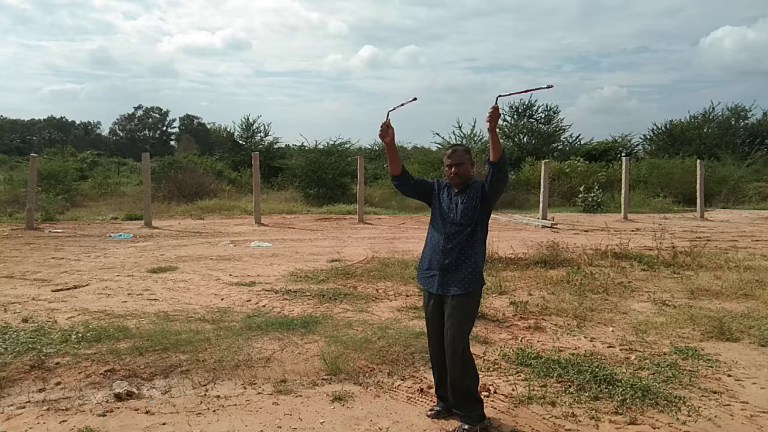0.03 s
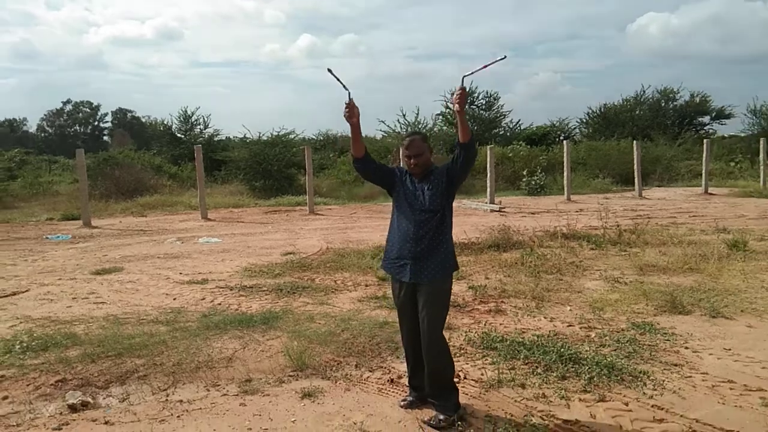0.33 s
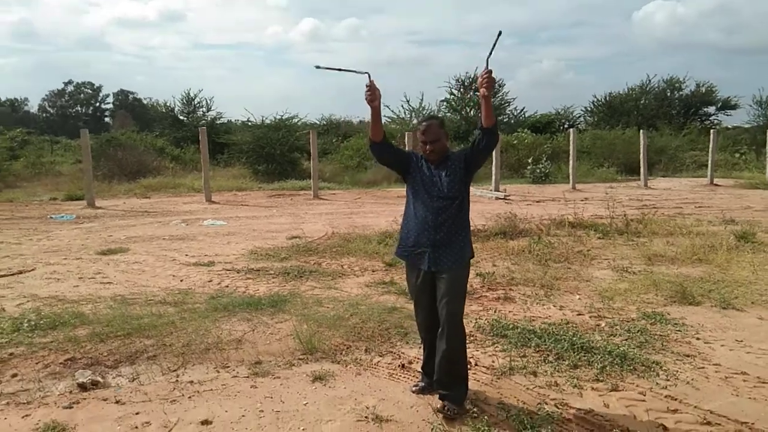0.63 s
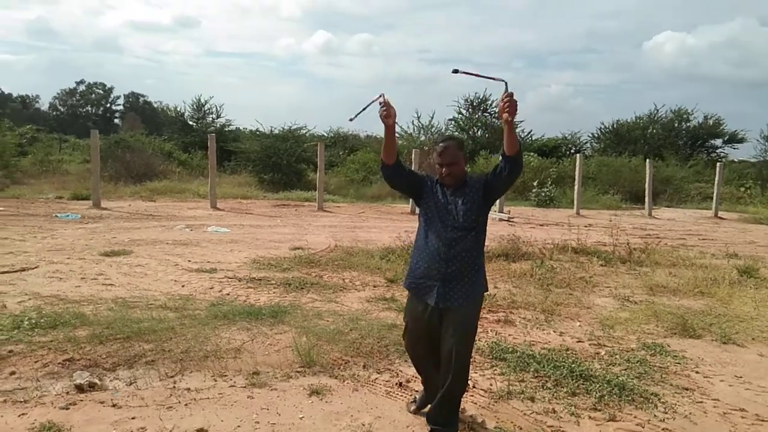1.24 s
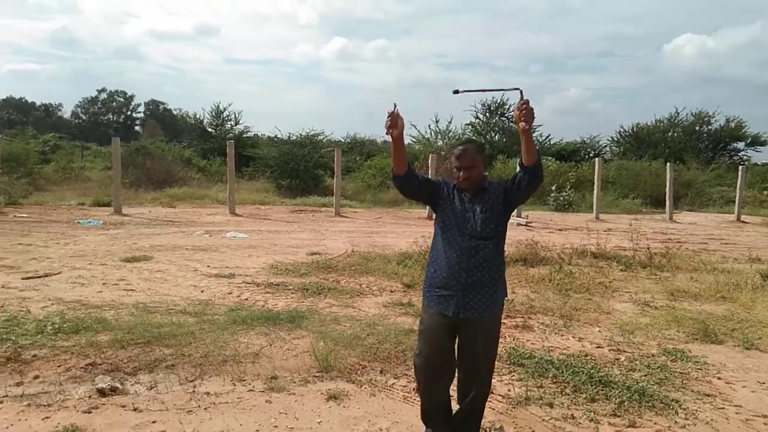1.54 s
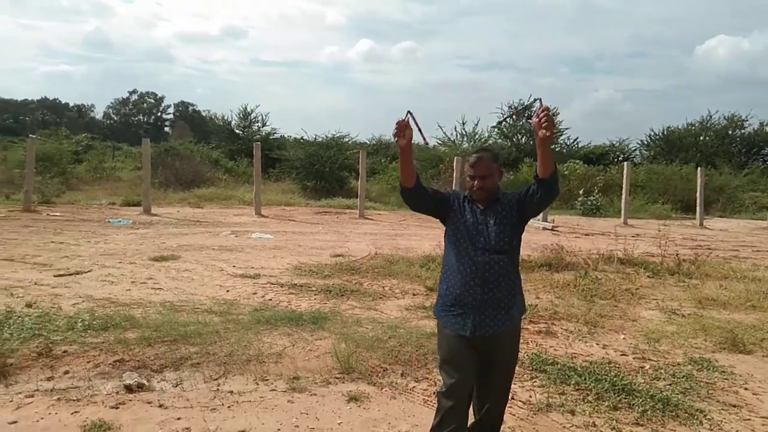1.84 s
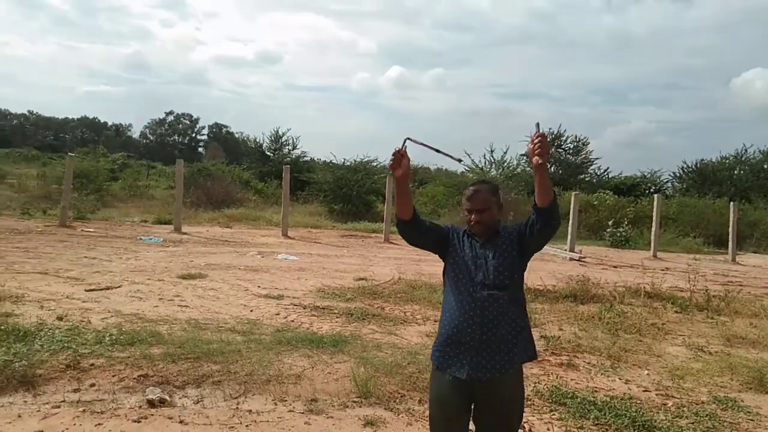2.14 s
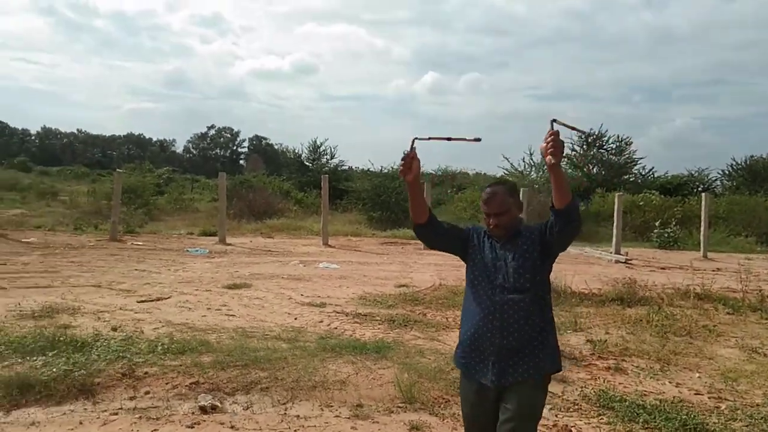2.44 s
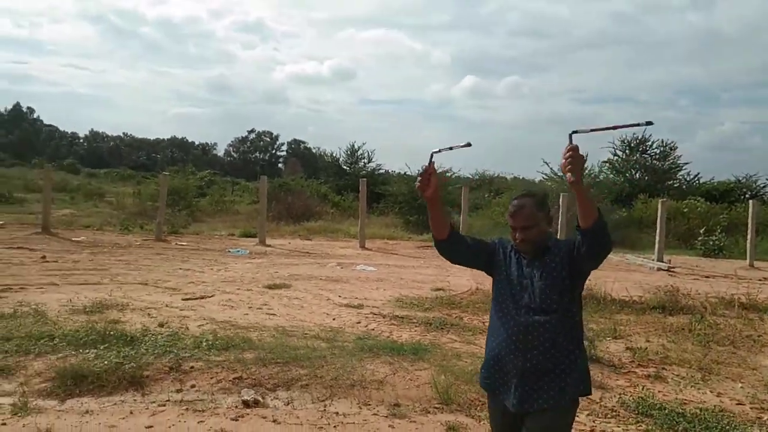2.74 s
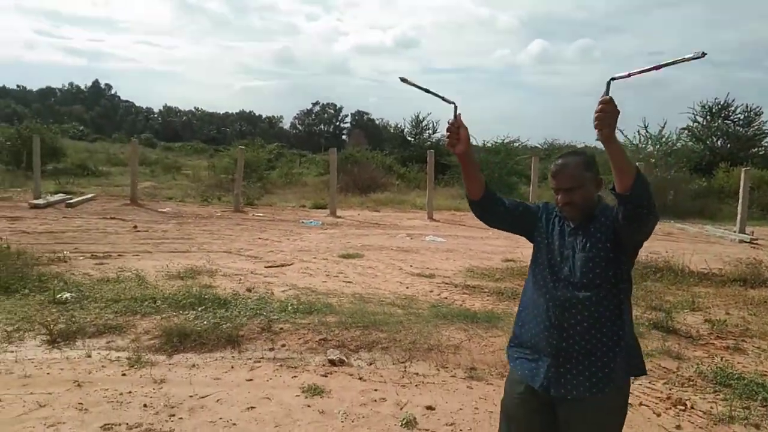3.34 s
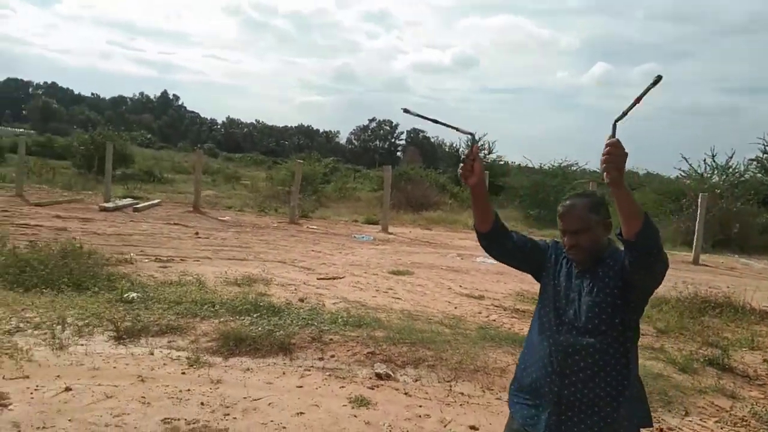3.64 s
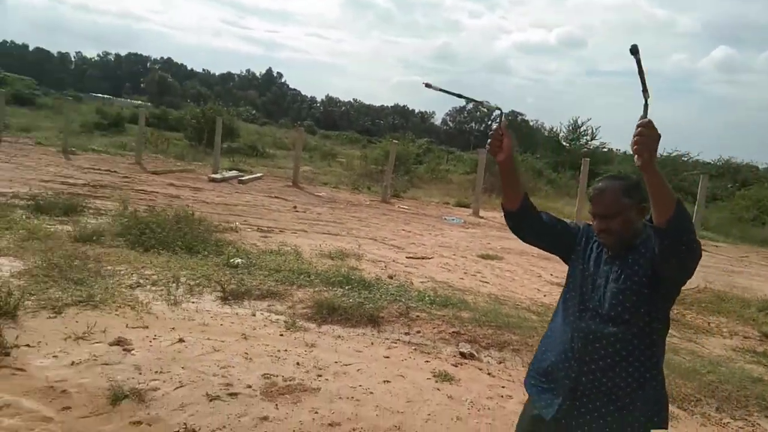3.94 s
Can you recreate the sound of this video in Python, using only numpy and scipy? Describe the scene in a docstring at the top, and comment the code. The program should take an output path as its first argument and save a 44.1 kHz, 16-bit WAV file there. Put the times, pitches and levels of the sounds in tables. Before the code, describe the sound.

Two metal rods squeak close by as they spin in a walker's fists, about three sharp chirps a second with dry rubbing and ticks between. Outdoors, wind gusts rumble and thump on the microphone, and faint steps scuff sand.

```python
"""Open ground, a faint outdoor hush, wind rumbling on the microphone. Close by, two bent metal rods rub
dryly in a walker's fists, and a sole scuffs the sand. The rods spin about three turns a second; on each
turn they stick and slip in thin gliding whistles, a sharp squeak and often a second one. From half a
second in, gusts swell and thump on the microphone, and handle ticks, then hoarse rasps, fall between
the squeaks. The rods keep turning to the end."""
import sys
import numpy as np
from scipy import signal
from scipy.fft import rfft, irfft
from scipy.io import wavfile

SR = 44100
rng = np.random.default_rng(int(sys.argv[2]) if len(sys.argv) > 2 else 0)


def transcribe(signal):
    """Save signal, clipped to [-1, 1], as a 16-bit WAV file at the path in sys.argv[1]."""
    frames = np.atleast_2d(signal).T
    limited = np.clip(frames, -1, 1)
    pcm = np.round(limited * 32767).astype(np.int16)
    wavfile.write(sys.argv[1], SR, pcm)


N = 176400
TOP_HZ = 15650


def undb(db):
    """Decibels to gain."""
    return 10 ** (np.asarray(db) / 20)


def unit(x):
    """Scale to rms 1."""
    return x / np.sqrt(np.mean(x ** 2))


def colour(x, spectrum):
    """Shape x by a spectrum; rms 1."""
    hz, db = np.array(spectrum).T
    f = np.maximum(np.fft.rfftfreq(len(x), 1 / SR), 1)
    return unit(irfft(rfft(x) * undb(np.interp(np.log(f), np.log(hz), db)), len(x)))


def noise(spectrum):
    """Steady noise with this spectrum; rms 1."""
    return colour(rng.standard_normal(N), spectrum)


def wander(rate):
    """A smooth random curve with spread 1, changing about rate times a second."""
    f = np.fft.rfftfreq(N, 1 / SR)
    f = f[f < 2000]
    re, im = rng.standard_normal((2, len(f)))
    return unit(irfft((re + 1j * im) * np.exp(-(2 * f / rate) ** 2), N))


def add(out, start, x):
    """Mix x in at a time."""
    i = int(np.clip(start * SR, 0, N))
    out[i:i + len(x)] += x[:N - i]


def envelope(length, attack_s, release_s):
    """Times and gains of an attack, a hold and an exponential release."""
    t = np.arange(int((length + 10 * release_s) * SR)) / SR
    return t, np.minimum(t / attack_s, 1) * np.exp(-np.maximum(t - length, 0) / release_s)


def piece(x, start, t):
    """The stretch of x from start, as long as t."""
    return np.take(x, int(start * SR) + np.arange(len(t)), mode="wrap")


def stick_slip(hz, overtone_db, scatter=0, harmonics_db=(-7.5, -23, -37)):
    """A friction tone with three overtones; uneven slips (scatter, radians) blur the high ones most."""
    phase = 2 * np.pi * np.cumsum(hz) / SR + scatter
    upper = sum(undb(db) * np.sin(k * phase) * (k * hz < SR / 2) for k, db in enumerate(harmonics_db, 2))
    return np.sqrt(2) * (np.sin(phase) + undb(overtone_db) * upper)


# Background of the open ground: freq_hz, level_db
HUSH_SPECTRUM = [(30, 17.5), (90, -21), (250, -5), (500, -5.5), (850, -13), (1300, -10), (2000, -9),
                 (3200, -5), (4600, -21), (7000, -10), (9000, -44), (15000, -41)]


def hush(level_db=-55):
    """Faint outdoor air all around, wavering a little."""
    return noise(HUSH_SPECTRUM) * undb(level_db + 1.9 * wander(42))


# Wind rumble on the microphone: freq_hz, level_db
WIND_SPECTRUM = [(20, -40), (36, -36), (55, -3), (85, -0.5), (125, -3), (200, -12), (300, -25), (480, -36),
                 (900, -53), (2000, -95)]
# Rise and fall of the gusts: time_s, level_db
GUSTS = [(.1, -78), (.2, -56), (.4, -51.5), (.56, -45.5), (.66, -29.5), (.78, -36.5), (.9, -40.5),
         (.97, -57), (1.05, -36), (1.18, -48.5), (1.32, -46.5), (1.55, -48), (1.7, -51), (1.97, -47),
         (2.15, -57.5), (2.37, -43), (2.6, -37), (2.7, -51), (2.86, -55.5), (3.0, -41.5), (3.17, -34.5),
         (3.3, -40.5), (3.42, -35.5), (3.57, -43), (3.72, -31), (3.86, -53.5), (4.0, -45.5)]


def wind(gain_db=2.5, flicker_db=3.5):
    """Low turbulence at the microphone that follows the gusts."""
    gust_db = np.interp(np.arange(N) / SR, *np.array(GUSTS).T)
    return noise(WIND_SPECTRUM) * undb(gain_db + gust_db + flicker_db * wander(38))


# Friction of the handles: freq_hz, level_db
FRICTION_SPECTRUM = [(500, -13.5), (1000, -12.5), (2000, -8.5), (2600, -4), (3300, 5.5), (4000, 2),
                     (4700, 0.5), (5700, 6), (7400, 5), (8600, -11), (10500, -15), (12500, -24),
                     (15500, -23)]
# Dry strokes, most of them in the fists: start_s, length_s, level_db
RUB_STROKES = [(0.11, 0.045, -48), (0.275, 0.086, -53), (0.34, 0.055, -49), (0.454, 0.024, -49),
               (0.49, 0.094, -45), (0.601, 0.059, -45), (0.731, 0.084, -46), (0.863, 0.046, -44),
               (0.932, 0.047, -48.5), (1.012, 0.033, -43), (1.068, 0.0057, -53), (1.156, 0.015, -43.5),
               (1.189, 0.014, -39), (1.218, 0.011, -38), (1.238, 0.013, -39.5), (1.277, 0.059, -47),
               (1.353, 0.02, -44), (1.408, 0.015, -43.5), (1.491, 0.06, -42.5), (1.589, 0.074, -44.5),
               (1.67, 0.024, -38), (1.711, 0.036, -52), (1.932, .095, -43.5), (2.04, 0.037, -50),
               (2.191, 0.048, -48.5), (2.287, 0.037, -45), (2.342, 0.048, -49), (2.549, 0.097, -43.5),
               (2.652, 0.058, -46), (2.828, 0.03, -44.5), (2.89, 0.015, -46), (2.954, 0.017, -41.5),
               (3.007, .055, -46), (3.073, 0.046, -42.5), (3.148, 0.096, -48), (3.27, 0.11, -43),
               (3.53, .025, -44), (3.57, .038, -42), (3.637, 0.023, -45.5), (3.666, 0.011, -36.5),
               (3.712, .13, -44.5), (3.881, 0.12, -42)]


def rubbing(idle_db=-54, grit_db=-6, skid_db=-23, skid_s=0.01, slips_per_s=6700):
    """Dense tiny slips of the handles: always a little, more in strokes and around each squeak."""
    pressure = np.full(N, undb(idle_db))
    for start, length, db in RUB_STROKES:
        _, env = envelope(length, attack_s=0.0024, release_s=0.0061)
        add(pressure, start, undb(db) * env)
    for start, length, db, *_ in TURN_SQUEAKS + ROCKING_SQUEAKS:
        _, env = envelope(length + skid_s, skid_s, skid_s)
        add(pressure, start - skid_s / 2, undb(db + skid_db) * env)
    slips = (rng.random(N) < slips_per_s / SR) * rng.choice([-1, 1], N)
    sizes = undb(1.7 * np.minimum(rng.exponential(size=N), 3))
    spectrum = rfft(colour(slips * sizes, FRICTION_SPECTRUM) + noise(FRICTION_SPECTRUM))
    f = np.fft.rfftfreq(N, 1 / SR)
    centres, width = np.linspace(0, TOP_HZ, 27, retstep=True)
    grit = np.zeros(N)
    for hz in centres:  # each ringing band swells and fades on its own
        band = np.maximum(1 - np.abs(f - hz) / width, 0)
        grit += irfft(spectrum * band, N) * undb(6 * wander(81))
    flicker_db = 3 * np.tanh(wander(180))
    return pressure * (unit(grit) * undb(grit_db + flicker_db) + chirps())


def chirps(count=1100, centre_hz=3210, typical_s=0.0048, gain_db=-14):
    """Moments when the rubbing catches and sings for a few milliseconds."""
    out, jitter = np.zeros(N), wander(1050)
    starts = rng.random(count) * N / SR
    for start, (pitch, bend, size, span) in zip(starts, rng.standard_normal((count, 4)).clip(-2, 2)):
        length = typical_s * np.exp(0.726 * span)
        t, env = envelope(length, attack_s=length / 2, release_s=0.0013)
        glide = 0.0418 * bend * np.minimum(t / length, 1)
        hz = centre_hz * np.exp(0.14 * pitch + glide + 0.015 * piece(jitter, start, t))
        add(out, start, undb(3.9 * size) * env * stick_slip(hz, overtone_db=-1.5))
    return unit(out) * undb(gain_db)


# Dry sand underfoot: freq_hz, level_db
SAND_SPECTRUM = [(300, -55), (800, -15), (1200, 7.5), (1700, 15.5), (2500, 16), (4000, -22), (9000, -50),
                 (15000, -58)]
# The walker's soft footsteps: start_s, length_s, level_db
STEPS = [(0.11, 0.027, -54.5), (0.741, 0.046, -51.5), (2.138, 0.01513, -59)]


def steps():
    """Soles scuff the sand."""
    weight = np.zeros(N)
    for start, length, db in STEPS:
        _, env = envelope(length, attack_s=0.017, release_s=0.02)
        add(weight, start, undb(db) * env)
    return weight * noise(SAND_SPECTRUM) * undb(2 * wander(300))


# Squeaks as the rods rock back: start_s, length_s, level_db, pitch_hz, glide_hz, overtone_db, roughness
ROCKING_SQUEAKS = [(0.159, 0.03, -53, 3400, -3.5, -5, 0.8), (0.266, 0.016, -52, 3180, 0, -15, 0.3),
                   (0.399, 0.011, -43, 3310, -8, -12, 0.4), (0.497, 0.021, -40, 3170, 47, -1, 0.25),
                   (0.594, 0.012, -41, 3310, 0, -25, 0.2), (0.817, 0.012, -42, 2890, -4.5, -9, 0.04),
                   (0.838, 0.011, -40, 3240, -11, 1, 0.6), (0.924, 0.019, -44, 3360, 200, -12, 0.2),
                   (1.268, 0.014, -39, 3574, -120, -3, 0.4), (1.42, 0.016, -44.5, 2900, -63, -1, 0.68),
                   (1.493, 0.025, -45, 3372, -3, -4, 1.1), (1.742, 0.019, -43.5, 2830, 5, -4, 0.46),
                   (1.792, 0.015, -38, 3430, 86, 3, 0.33), (1.833, 0.0087, -39.5, 3254, 0, 12, 0.93),
                   (1.855, 0.0143, -29.5, 3353, 151, 4.5, 0.38), (1.872, 0.011, -42.5, 2870, -150, -1, 0.4),
                   (1.971, 0.0075, -36.5, 3580, -75, 1, 0.3), (2.14, 0.02, -34, 3397, -130, 4, 0.56),
                   (2.286, 0.01, -39, 3210, 304, -25, 0.3), (2.516, 0.0094, -33, 3300, -9, 1.5, 0.63),
                   (2.601, .013, -41.5, 3260, 0, -10, 0.4), (2.765, 0.014, -27.5, 3226, 230, -5, 0),
                   (2.779, 0.021, -44.5, 3940, -130, 8, .5), (2.841, 0.015, -32.5, 3320, -26, -2, 0.27),
                   (3.104, 0.023, -41.5, 3890, 165, 3, 0.17), (3.164, 0.026, -40.5, 3332, -2, 7, 0.36),
                   (3.179, .01, -33, 3290, -68, 1.5, 0.54), (3.414, 0.013, -35.5, 3770, 283, -1.5, 0.2),
                   (3.48, 0.014, -36.5, 3320, -130, 6, 0.58), (3.717, 0.013, -37, 3270, -58, -10, 0.54),
                   (3.805, 0.014, -39.5, 3193, -11, 1, 0.28)]
# The main squeak of each turn, and the level of that turn's whistles:
# start_s, length_s, level_db, pitch_hz, glide_hz, overtone_db, roughness, whistle_db
TURN_SQUEAKS = [(0.436, 0.027, -39.5, 3355, 116, 2, 0.36, -63.5),
                (0.778, 0.027, -33, 3390, 12, 2, 0.19, -63.5),
                (1.104, 0.025, -36, 3435, -45, 5.5, 0.25, -63),
                (1.438, 0.024, -34.5, 3375, -31, 4.5, 0.22, -63.5),
                (1.774, 0.013, -33.5, 3280, 92, -4.5, 0.23, -61),
                (2.129, 0.011, -35.5, 3414, 325, 3.5, 0.38, -63.5),
                (2.424, 0.018, -35.5, 3224, 52, -0.5, 0.43, -63),
                (2.751, .013, -29.5, 3167, 75, -3, 0.2, -63.5),
                (3.082, 0.023, -37.5, 3090, 325, -1, 0.68, -60.5),
                (3.395, 0.023, -36.5, 3192, 396, 1, 0.88, -59),
                (3.738, 0.028, -41, 3304, 398, 10.5, 0.58, -65)]


def squeaks(jitter_hz=233, flutter_db=5, rasp_db=-3.5):
    """The rods stick and slip in short gliding tones; rough ones jitter in pitch, flutter and rasp."""
    out, jitter, flutter, rasp = np.zeros(N), wander(1150), wander(500), noise(FRICTION_SPECTRUM)
    scatter = 0.11 * wander(2500)  # each slip comes a little early or late
    for start, length, db, pitch, glide, overtone_db, rough, *_ in TURN_SQUEAKS + ROCKING_SQUEAKS:
        t, env = envelope(length, attack_s=0.0043, release_s=0.0013)
        progress = np.minimum(t / length, 1)
        hz = pitch + glide * progress + rough * jitter_hz * piece(jitter, start, t)
        tone = stick_slip(hz, overtone_db, piece(scatter, start, t))
        hiss = rough * undb(rasp_db) * piece(rasp, start, t)
        swell_db = 2.5 * (np.sin(np.pi * progress) - 1)  # loudest in the middle
        gain = undb(db + swell_db + rough * flutter_db * piece(flutter, start, t))
        add(out, start, gain * env * (tone + hiss))
    return out


RING_HZ, HUM_HZ = 8740, 1145  # the highest and lowest whistle
# Whistles, relative to each turn's start_s and whistle_db:
# offset_s, length_s, from_hz, to_hz, level_db, overtone_db
WHISTLES = [(.11, 0.045, 1420, 1350, -2.5, 14), (.02, 0.058, 1540, 1480, -6.5, -24),
            (-.12, 0.042, RING_HZ, RING_HZ, -1.5, -30), (.125, 0.061, HUM_HZ, HUM_HZ, -3.5, -20),
            (-.1, 0.03, HUM_HZ, HUM_HZ, -2.5, -20)]


def whistles(vary_hz=20, waver_hz=35, flutter_db=4, vary_s=0.004):
    """The same soft, unsteady friction tones come round on every turn, never quite alike."""
    out, jitter, flutter = np.zeros(N), wander(340), wander(130)
    for turn_start, *_, turn_db in TURN_SQUEAKS:
        for offset, length, from_hz, to_hz, db, overtone_db in WHISTLES:
            t, env = envelope(length, attack_s=length / 3, release_s=0.0019)
            ends_hz = rng.normal([from_hz, to_hz], vary_hz)
            start = rng.normal(turn_start + offset, vary_s)
            hz = np.interp(t, [0, length], ends_hz) + waver_hz * piece(jitter, start, t)
            gain = undb(turn_db + db + flutter_db * piece(flutter, start, t))
            add(out, start, gain * env * stick_slip(hz, overtone_db))
    return out


# A rod swinging up towards its squeak: start_s, length_s, level_db, from_hz, to_hz
CREAKS = [(0.343, .07, -56.5, 2300, 2120), (0.674, 0.06, -57.5, 2490, 2100), (1.02, .025, -54, 2340, 2400),
          (1.319, 0.053, -63, 1780, 2020), (1.363, 0.02, -48, 2080, 2160), (1.677, 0.045, -51, 2340, 2200),
          (2.021, 0.0081, -52.5, 2400, 2480), (2.064, 0.017, -48, 2080, 2220),
          (2.361, .045, -62, 1870, 2120), (3.008, 0.068, -57, 1830, 2050),
          (3.329, 0.092, -62.5, 1780, 2080), (3.674, 0.035, -52.5, 2085, 2200)]


def creaks(waver_hz=114.4, flutter_db=4, overtone_db=-13.5):
    """A swinging rod creaks in a soft, unsteady glide with three equally strong overtones."""
    out, jitter, flutter = np.zeros(N), wander(820), wander(330)
    for start, length, db, from_hz, to_hz in CREAKS:
        t, env = envelope(length, attack_s=0.0043, release_s=0.004)
        hz = np.interp(t, [0, length], [from_hz, to_hz]) + waver_hz * piece(jitter, start, t)
        gain = undb(db + flutter_db * piece(flutter, start, t))
        add(out, start, gain * env * stick_slip(hz, overtone_db, harmonics_db=(0, 0, 0)))
    return out


# Thumps of wind right on the microphone: centre_s, level_db, pitch_hz
BUFFETS = [(.451, -33, 120), (0.603, -39, 276), (.621, -33, 322), (.636, -30, 141), (.650, -21, 180),
           (0.671, -21, 153), (0.72, -27.5, 100), (0.865, -25, 94), (1.02, -28.5, 156), (1.036, -26, 143),
           (1.051, -31, 108), (1.304, -28.5, 101), (1.662, -27, 113), (1.878, -26.5, 112),
           (2.457, -22, 193), (2.522, -31, 145), (2.61, -30, 170), (2.64, -27.5, 178), (3.136, -18.5, 113),
           (3.175, -21, 175), (3.214, -22.5, 159), (3.359, -23, 102), (3.481, -21.5, 150),
           (3.666, -24.5, 105), (3.693, -18, 199.8), (3.714, -23, 75.4), (3.782, -25, 127)]


def buffets(gain_db=4.5, width_cycles=0.25):
    """Single eddies hit the microphone and thump for a cycle or two."""
    out, t = np.zeros(N), np.arange(N) / SR
    for centre, db, hz in BUFFETS:
        cycles = (t - centre) * hz
        near = np.abs(cycles) < 10
        thump = np.sin(2 * np.pi * cycles[near]) / np.cosh(cycles[near] / width_cycles)
        out[near] += undb(db + gain_db) * thump
    return out


# Ticks in the fists: start_s, level_db
TICKS = [(.696, -45.5), (1.092, -49), (1.814, -56), (1.934, -48.5), (2.105, -47.5), (2.418, -47),
         (2.479, -45.5), (2.939, -45.5), (3.037, -39.5), (3.228, -49), (3.449, -41), (3.899, -40)]


def ticks(gain_db=5):
    """A handle slips with a dry click, damped at once by the hand."""
    force = np.zeros(N)
    _, click = envelope(0.00072, attack_s=0.000056, release_s=0.003)
    for start, db in TICKS:
        add(force, start, undb(db + gain_db) * click)
    return force * noise(FRICTION_SPECTRUM)


# Hoarse rasps where the rubbing nearly sings: start_s, length_s, level_db, centre_hz
RASPS = [(1.189, .01, -43, 5300), (1.229, 0.011, -42, 5400), (1.861, 0.0081, -44.5, 4800),
         (2.953, 0.018, -47, 4160), (3.036, 0.0051, -34.5, 6000), (3.278, .055, -52, 4130)]


def rasps(relative_width=0.082):
    """Friction that rings in one broad band without settling on a pitch."""
    out = np.zeros(N)
    for start, length, db, hz in RASPS:
        t, env = envelope(length, attack_s=0.0029, release_s=0.0033)
        band = rng.standard_normal(len(t))
        for q in (1 / relative_width, 0.5 / relative_width):
            band = signal.lfilter(*signal.iirpeak(hz, q, SR), band)
        add(out, start, undb(db) * env * unit(band))
    return out


def ground_echo(direct, level_db=-7.5, decay_s=0.0096):
    """Nearby ground and bushes scatter a faint, short echo back to the microphone."""
    t = np.arange(SR // 2) / SR
    scatter = rng.standard_normal(len(t)) * np.exp(-t / decay_s)
    return undb(level_db) * signal.fftconvolve(direct, scatter / np.linalg.norm(scatter))[:N]


def scene():
    """The rods and their echo, the hush, the steps and the wind, all at one microphone."""
    rods = squeaks() + creaks() + whistles() + rubbing() + rasps() + ticks()
    return (rods + ground_echo(rods) + hush() + steps() + wind() + buffets())[None]


def record(dry):
    """The microphone opens after a moment; the deep bass and the top are cut."""
    open_s, fade_s, low_cut_hz = 0.114, 0.018, 42
    opening = np.clip((np.arange(N) / SR - open_s) / fade_s, 0, 1)
    f = np.fft.rfftfreq(N, 1 / SR)
    thinned = irfft(rfft(dry) * f ** 4 / np.hypot(f ** 4, low_cut_hz ** 4), N)
    high_cut = signal.ellip(10, 0.2, 80, TOP_HZ, fs=SR, output="sos")
    return signal.sosfilt(high_cut, thinned * opening)


dry = scene()
out = record(dry)
transcribe(out)
```